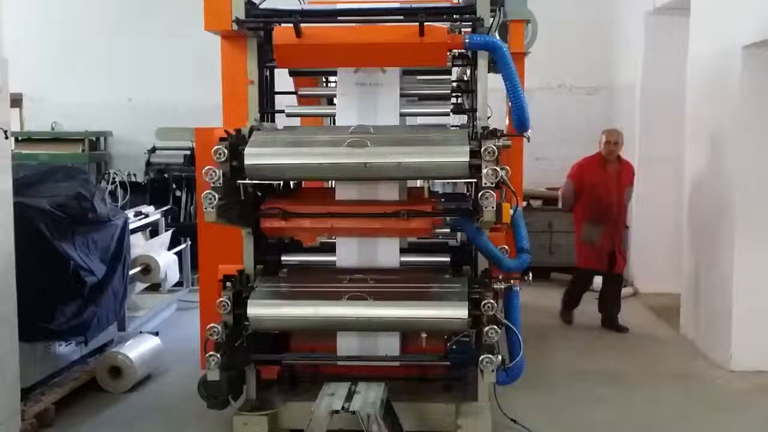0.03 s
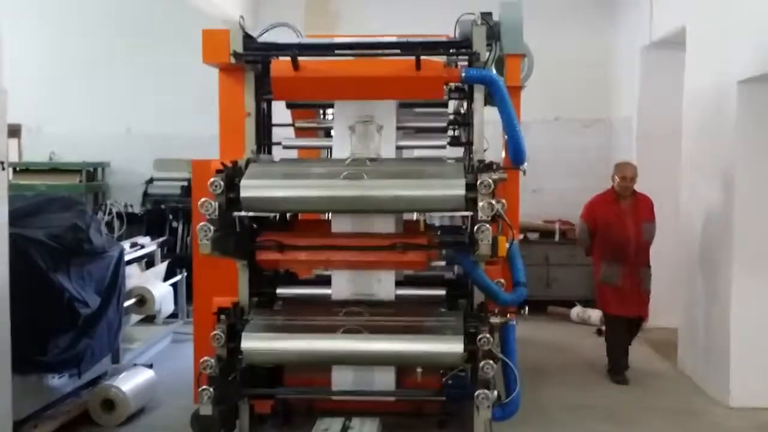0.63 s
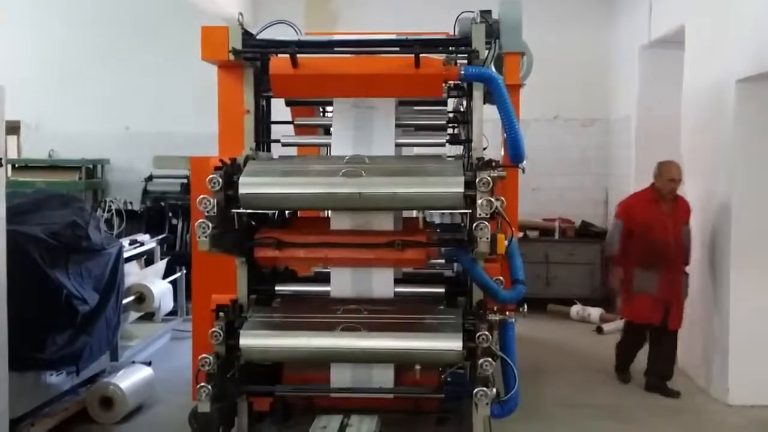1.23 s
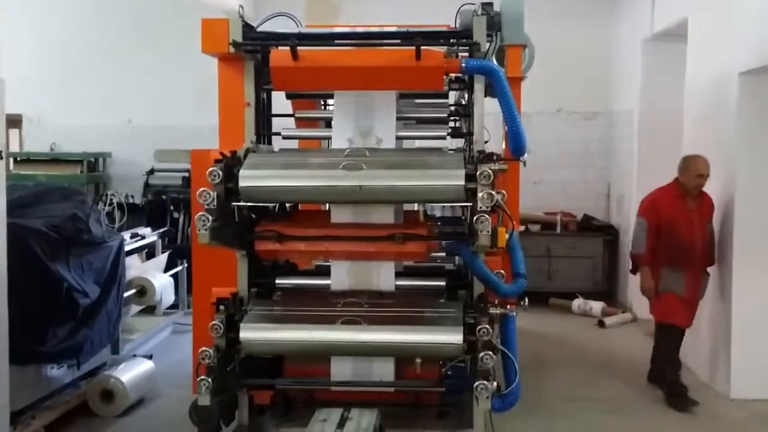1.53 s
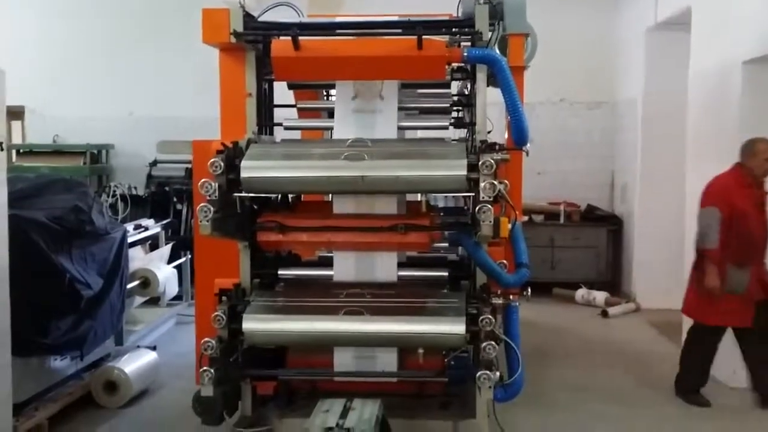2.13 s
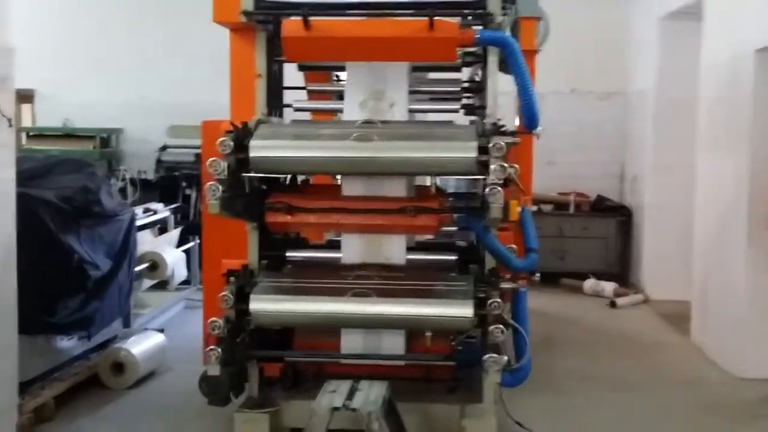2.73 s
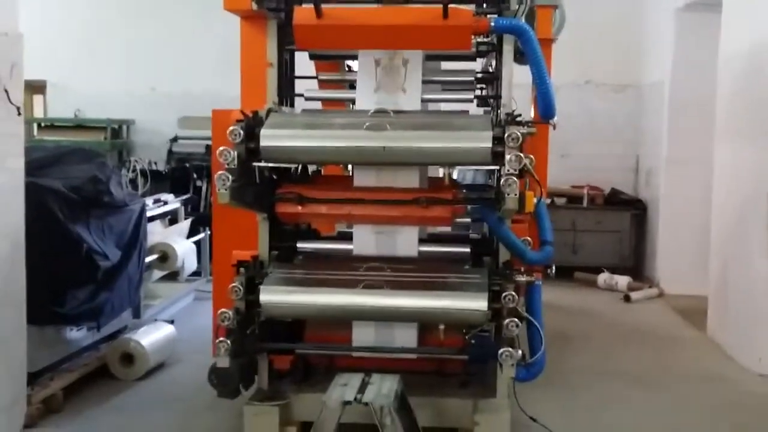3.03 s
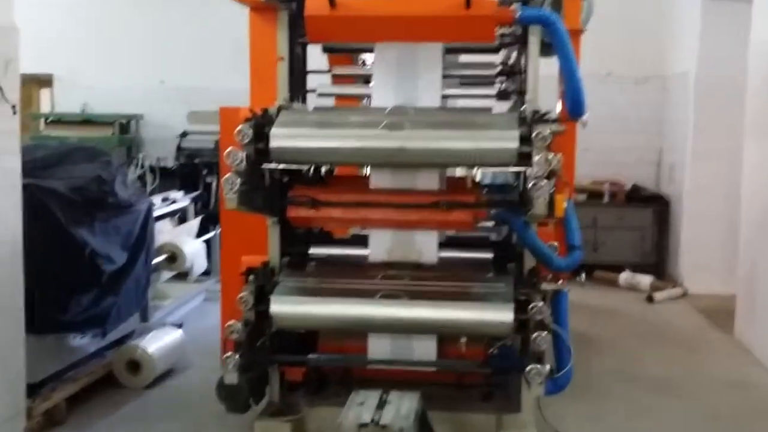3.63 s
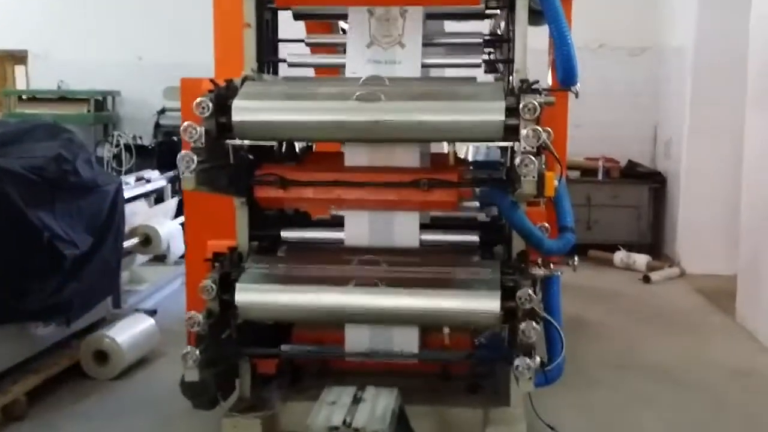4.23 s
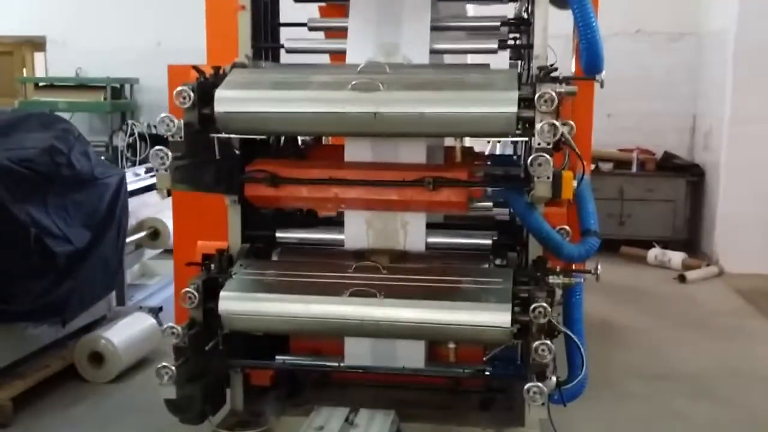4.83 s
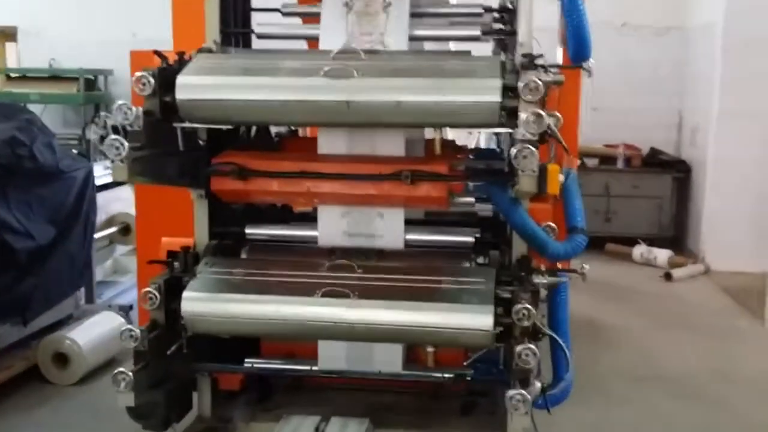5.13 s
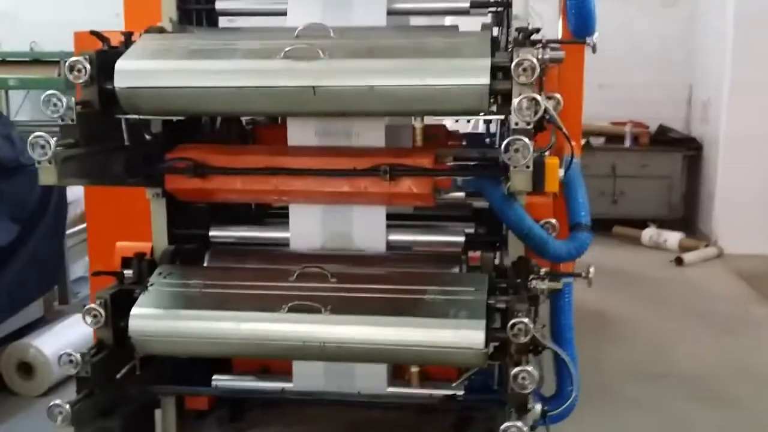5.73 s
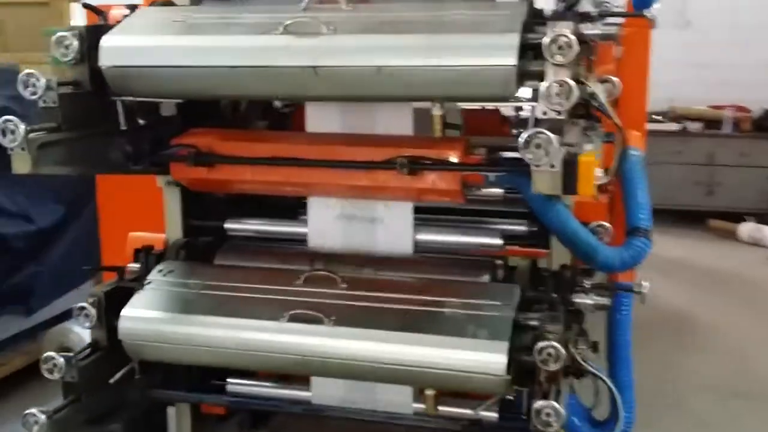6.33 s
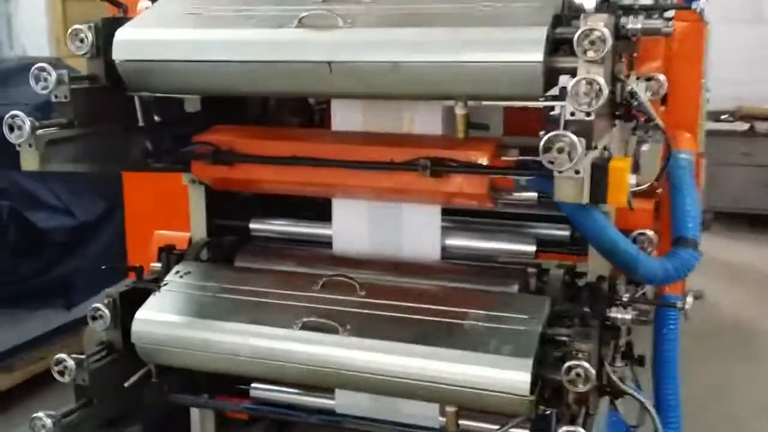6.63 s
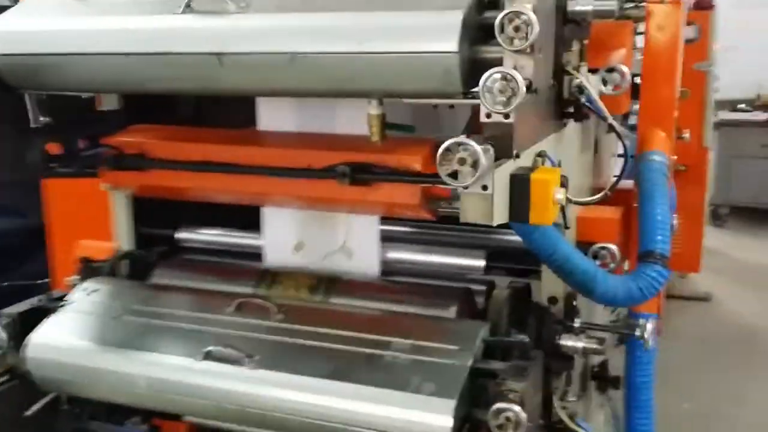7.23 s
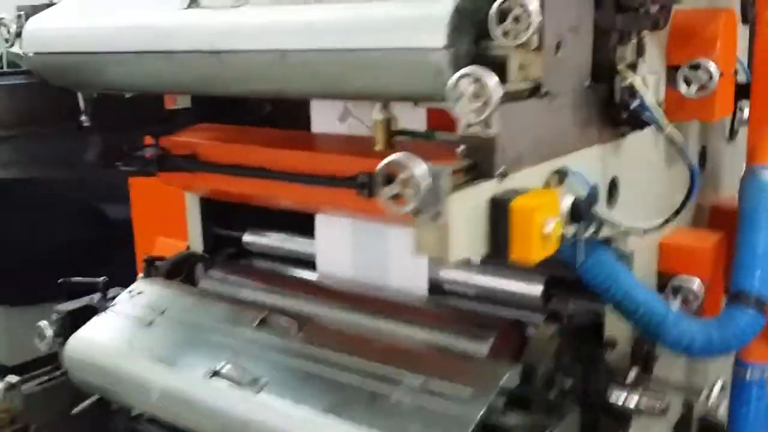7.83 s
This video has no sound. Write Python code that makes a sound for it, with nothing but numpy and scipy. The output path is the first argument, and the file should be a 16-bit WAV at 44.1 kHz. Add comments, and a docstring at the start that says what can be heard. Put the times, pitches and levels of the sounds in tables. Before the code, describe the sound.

A running printing machine fills a workshop with a low rumble, droning gears and the rush of drying fans. It fades in just after the start and keeps an even level. Plastic film hisses over the rollers, now and then swishing or snapping lightly, while steel rollers ring faintly and the machine's body throbs. A wavering fan whine and a very high motor whistle flicker as the microphone moves closer.

```python
"""After a moment of silence, a flexographic printing press fades in with a soft bump in a bare workshop.
From the start, rollers and gears rumble, dryer fans roar and whine, the film web hisses, the mains hum
and the motor's inverter sings near 8 kHz. Soon the film rips and snaps off the plates and a steel roller
rings out. Then the listener, a spaced pair of microphones, walks slowly up to the press: the high tones
flicker faster, the frame throbs now and then, and the film swishes over the rollers."""
import sys
import numpy as np
from scipy import signal
from scipy.fft import rfft, irfft
from scipy.io import wavfile

SR = 44100
rng = np.random.default_rng(int(sys.argv[2]) if len(sys.argv) > 2 else 0)


def generate_wav(signal):
    """Clip the signal to [-1, 1] and save it as 16-bit WAV at the path in sys.argv[1]."""
    frames = np.transpose(np.atleast_2d(signal))
    scaled = np.clip(frames, -1, 1) * 32767
    pcm = np.round(scaled).astype(np.int16)
    wavfile.write(sys.argv[1], SR, pcm)


N = 352800
TIME = np.arange(N) / SR
FREQS = np.maximum(np.arange(N // 2 + 1) * SR / N, 1)


def from_db(db):
    """Amplitude ratio of a level in decibels."""
    return 10 ** (np.asarray(db) / 20)


def rms_one(x):
    """Normalisation to unit mean power."""
    return x / np.sqrt(np.mean(np.abs(x) ** 2) + 1e-20)


def in_time(rows):
    """Linear interpolation of each level column at every sample."""
    times, *columns = np.transpose(rows)
    return [np.interp(TIME, times, column) for column in columns]


def at_hz(points, hz):
    """Interpolation of a spectrum on a logarithmic frequency axis."""
    knots_hz, values = np.transpose(points)
    return np.interp(np.log(hz), np.log(np.sort(knots_hz)), values)


def drift(rate):
    """Low-pass random process of rms 1, changing about `rate` times a second."""
    hop, settle = 100, 1000
    pole = np.exp(-2 * np.pi * rate * hop / SR)
    white = rng.standard_normal(N // hop + settle + 2)
    slow = signal.lfilter([1], [1, -2 * pole, pole * pole], white)[settle:]
    return np.interp(np.arange(N) / hop, np.arange(len(slow)), rms_one(slow))


def turbulence(flutter_db, rate):
    """Random amplitude modulation of two independent white noises."""
    return rng.standard_normal((2, N)) * from_db(flutter_db * drift(rate))


def swells(rows):
    """Gaussian envelopes, each rising and falling about its moment."""
    return sum(from_db(db) * np.exp(-(2 * (TIME - s) / length_s) ** 2) for s, length_s, db in rows)


def transient(peak_s, attack_s, decay_s):
    """Envelope of a linear rise and an exponential decay."""
    since = TIME - peak_s
    return np.clip(since / attack_s + 1, 0, 1) * np.exp(-np.maximum(since, 0) / decay_s)


def on_approach(far, change, start_s=1.285, end_s=5.7):
    """Linear change of a quantity as the listener walks up to the press."""
    return far + change * np.clip((TIME - start_s) / (end_s - start_s), 0, 1)


def dip(depth_db, start_s=5.1, fall_s=0.25, recover_s=0.76):
    """Brief attenuation in dB: a quick fall and a slow recovery."""
    since = TIME - start_s
    return -depth_db * np.clip(np.minimum(since / fall_s, 1 - (since - fall_s) / recover_s), 0, 1)


# likeness of the two microphone signals: (frequency [Hz], correlation [1])
CORRELATION = [(25, .5), (80, 1), (300, 0.92), (420, 0.89), (560, 0.63), (800, 0.63), (1050, 0.23),
               (1500, -0.29), (2300, 0.23), (3000, -0.016)]

def side_share(hz):
    """Spatial coherence as a side-to-mid ratio: long waves agree, those near 1.5 kHz partly oppose."""
    correlation = np.clip(at_hz(CORRELATION, hz), -.9, .993)
    return np.sqrt((1 - correlation) / (1 + correlation))


def stereo(mid, side):
    """Sum and difference of mid and side give left and right."""
    return np.array([mid + side, mid - side])


def room_noise(spectrum, excitation, ripple_db):
    """Diffuse field: interfering reflections ripple the spectrum of a noise; the mid has rms 1."""
    knots_hz = np.arange(150, SR / 2, 6)
    heights = rng.uniform(-0.95, 1, len(knots_hz)) * np.sqrt(3)
    ripple = np.interp(FREQS, knots_hz, heights, left=0)
    shaped = rfft(excitation) * from_db(at_hz(spectrum, FREQS) + ripple_db * ripple)
    mid, side = irfft(shaped[0], N), irfft(shaped[1] * side_share(FREQS), N)
    return stereo(mid, side) / np.std(mid)


def phasor(hz, wobble_hz, rate):
    """Random frequency modulation of a complex tone."""
    cycles = np.cumsum(hz + wobble_hz * drift(rate)) / SR + rng.random()
    return np.exp(2j * np.pi * cycles)


def reflections(fade_rate):
    """Rayleigh fading: summed reflections wander in amplitude and phase."""
    return drift(fade_rate) + 1j * drift(fade_rate)


def room_tone(hz, scatter, fade_rate, wobble_hz):
    """Multipath interference: a direct tone plus reflections that differ at each microphone."""
    carrier = phasor(hz, wobble_hz, rate=2.06)
    mid = rms_one(1 + scatter * reflections(fade_rate))
    side = side_share(hz) * rms_one(reflections(fade_rate))
    return np.sqrt(2) * stereo((mid * carrier).real, (side * carrier).real)


def walked_tone(hz, scatter, fade_rate, wobble_hz, still_pace=.2):
    """Motion through an interference pattern: a high tone flickers faster as the pace rises."""
    path = np.cumsum(on_approach(still_pace, 1 - still_pace)) / SR
    mid = np.interp(path, TIME, rms_one(1 + scatter * reflections(fade_rate)))
    side = np.interp(path, TIME, rms_one(1 + scatter * reflections(fade_rate)))
    side_phase = np.pi / 2 + np.interp(path, TIME, drift(0.73))
    side = side_share(hz) * side * np.exp(1j * side_phase)
    carrier = phasor(hz, wobble_hz, rate=2.01)
    return np.sqrt(2) * stereo((mid * carrier).real, (side * carrier).real)


# rumble of the gear train, resonance of the covers, churn of the rollers: (time [s], relative level [dB])
RUMBLE_LEVEL = [(0.9, -15), (2.02, -15), (2.23, -15.5), (2.79, -14.0), (3.0, -14.5), (3.77, -14.5),
                (4.33, -15), (4.54, -12.5), (5.59, -16), (6.15, -13.5), (6.78, -12.5), (7.13, -13),
                (7.55, -13), (7.97, -16.5)]
COVER_LEVEL = [(0.9, -25), (1.46, -22.5), (1.67, -26), (4.75, -23.5), (5.1, -20.5), (5.73, -22),
               (6.5, -22.5), (6.97, -19), (7.69, -19), (7.97, -18.5)]
CHURN_LEVEL = [(0.9, -38), (1.3, -26.5), (1.7, -30), (2.2, -38), (2.6, -26), (3.3, -23.5), (3.6, -22.5),
               (4.3, -26.5), (4.7, -27.5), (5.3, -26.5), (5.9, -26), (6.6, -24), (7.4, -23.5), (8.0, -27.5)]
# their spectra: (frequency [Hz], relative density [dB])
RUMBLE_SPECTRUM = [(55, -45), (85, -18.5), (110, -9), (160, -4.5), (205, -2), (250, -1.5), (315, -1),
                   (400, -7), (450, -7.5), (520, -20), (800, -60)]
COVER_SPECTRUM = [(300, -42), (420, -3), (465, 1.5), (520, -1), (570, -3), (640, -14.5), (850, -46)]
CHURN_SPECTRUM = [(290, -30.5), (345, -1.5), (380, 2.5), (405, -0.5), (450, -12), (540, -47.5)]
# lesser gear meshes and ringing panels: (frequency [Hz], mean level [dB])
MESH_TONES = [(139.3, -43), (172.3, -37.5), (229.5, -36), (242.9, -34.5), (295.4, -36), (399, -37.5),
              (553.1, -40.5), (1063.2, -43), (2644.5, -59), (2788, -47), (4160, -60)]

def rollers():
    """Forced vibration: the rollers shake frame and covers, and gear tones waver with the load."""
    rumble_db, = in_time(RUMBLE_LEVEL)
    cover_db, = in_time(COVER_LEVEL)
    churn_db, = in_time(CHURN_LEVEL)
    rumble = room_noise(RUMBLE_SPECTRUM, turbulence(flutter_db=-1, rate=47), ripple_db=-1.2)
    covers = room_noise(COVER_SPECTRUM, turbulence(flutter_db=0.2, rate=4.7), ripple_db=3.5)
    churn = room_noise(CHURN_SPECTRUM, turbulence(flutter_db=0.3, rate=11), ripple_db=2)
    gears = sum(from_db(db) * room_tone(hz, scatter=0.69, fade_rate=1.5, wobble_hz=1.206)
                for hz, db in MESH_TONES)
    return (from_db(rumble_db - 4.5) * rumble + from_db(cover_db - 4) * covers
            + from_db(churn_db) * churn + from_db(rumble_db - rumble_db.mean()) * gears)


# boom of the hall: (frequency [Hz], relative density [dB])
BOOM_SPECTRUM = [(20, -22), (45, -11), (62, -2), (75, 8), (90, 6), (110, -22), (160, -46)]

def hall_boom():
    """Room resonance: a low boom that weakens over the walk and dips once."""
    boom = room_noise(BOOM_SPECTRUM, turbulence(flutter_db=0.5, rate=8.7), ripple_db=-2)
    return from_db(on_approach(-41.5, -5.5) + dip(depth_db=4.5)) * boom


# drive gear's mesh tone, its fourth harmonic, a roller gear's mesh tone: (time [s], relative level [dB])
DRIVE_LEVEL = [(0.9, -35), (1.18, -34), (1.39, -26.5), (1.7, -45), (1.88, -21), (2.09, -31), (3.95, -27),
               (4.3, -26), (4.51, -23), (4.7, -27), (5.1, -37), (5.25, -23.5), (5.45, -21.5), (5.63, -21.5),
               (5.82, -35), (6.01, -27.5), (6.33, -25.5), (6.55, -38), (6.85, -36), (7.08, -22.5),
               (7.34, -28), (7.6, -22.5), (7.83, -23), (7.97, -15)]
FOURTH_LEVEL = [(0.9, -29), (1.5, -31.5), (1.68, -34), (2.2, -36), (2.55, -27), (2.75, -36), (2.95, -34),
                (3.25, -25), (3.55, -28.5), (3.72, -42), (3.92, -28), (4.3, -36), (4.8, -40), (5.08, -29),
                (5.38, -41), (5.65, -37), (6.1, -31.5), (6.45, -48), (6.9, -29.5), (7.25, -28.5),
                (7.5, -40), (7.75, -30.5), (8.0, -34)]
ROLLER_GEAR_LEVEL = [(0.9, -27.5), (3.5, -29), (3.68, -28), (4.1, -19), (4.45, -36), (4.75, -26),
                     (5.17, -19), (5.35, -38), (5.72, -34), (5.9, -27), (6.22, -19), (6.43, -21.5),
                     (6.6, -40), (8.0, -40)]

def gear_mesh(drive_hz=184.6, roller_hz=339.8):
    """Periodic tooth contact: two gears drone at their mesh rates, the drive also two octaves above."""
    drive_db, = in_time(DRIVE_LEVEL)
    fourth_db, = in_time(FOURTH_LEVEL)
    roller_db, = in_time(ROLLER_GEAR_LEVEL)
    drive = room_tone(drive_hz, scatter=0.15, fade_rate=4.4, wobble_hz=0.86)
    fourth = room_tone(4 * drive_hz, scatter=0.21, fade_rate=4.2, wobble_hz=1.146)
    roller = room_tone(roller_hz, scatter=0.57, fade_rate=7, wobble_hz=2.522)
    return (from_db(drive_db - 0.2) * drive + from_db(fourth_db) * fourth
            + from_db(roller_db - 1.5) * roller)


# ringing of the hollow sheet-metal guards: (time [s], level [dB])
GUARD_LEVEL = [(0.9, -33.5), (1.25, -30.5), (1.45, -42), (1.95, -32), (2.15, -35), (2.4, -31), (2.6, -37),
               (2.95, -35), (3.1, -40), (3.4, -38), (4.4, -38.5), (4.55, -35.5), (5.0, -36), (5.4, -52),
               (5.8, -48), (6.05, -40), (7.15, -38.5), (7.35, -53), (8.0, -52)]
# modes of the guards and of the bare steel rollers: (frequency [Hz], relative level [dB])
GUARD_RESONANCES = [(766, -4), (815, -3), (858, -1), (911, -2.5), (958, 0.5), (978, 0)]
ROLLER_RESONANCES = [(1760, -3), (1841, 1.5), (1874, -4), (1960, 0), (2035, 3), (2078, -9.5)]

def ringing_metal(roller_db=-43.5):
    """Modal resonance: the gears keep the guards ringing, and the rollers' close modes beat faintly."""
    guard_db, = in_time(GUARD_LEVEL)
    guards = sum(from_db(db) * room_tone(hz, scatter=4.1, fade_rate=11, wobble_hz=2.134)
                 for hz, db in GUARD_RESONANCES)
    steel = sum(from_db(db) * room_tone(hz, scatter=3, fade_rate=20, wobble_hz=3.503)
                for hz, db in ROLLER_RESONANCES)
    return from_db(guard_db) * guards + from_db(roller_db) * steel


# rush of the dryer nozzles: (time [s], relative level [dB])
NOZZLE_LEVEL = [(0.9, -20.5), (1.25, -20.5), (2.45, -20), (3.1, -21), (3.72, -21), (3.98, -21.5),
                (4.35, -20), (5.05, -20.5), (5.24, -22), (5.7, -22.5), (6.25, -20.5), (7.0, -21.5),
                (7.7, -21.5), (7.97, -22.5)]
# air in the ducts and from the nozzles: (frequency [Hz], relative density [dB])
DUCT_SPECTRUM = [(350, -30), (520, -2.5), (610, 0.5), (700, 1), (830, -0.9), (980, -2), (1080, -3),
                 (1280, -4), (1450, -49), (2200, -61)]
NOZZLE_SPECTRUM = [(800, -30), (1150, -18.5), (1330, 2), (1620, 0), (1850, 1.3), (2100, 1.0), (2300, -1.5),
                   (2550, -4), (2900, -21), (4000, -53)]

def dryer_air():
    """Turbulent flow: air roars in the ducts and rushes from the nozzles."""
    duct_db = on_approach(-22.5, -1) + dip(depth_db=1.5)
    nozzle_db, = in_time(NOZZLE_LEVEL)
    duct = room_noise(DUCT_SPECTRUM, turbulence(flutter_db=0.96, rate=17), ripple_db=2)
    nozzle = room_noise(NOZZLE_SPECTRUM, turbulence(flutter_db=0.77, rate=62), ripple_db=2.5)
    return from_db(duct_db) * duct + from_db(nozzle_db - 4) * nozzle


# harmonics of the dryer fan's shaft rate: (order [1], level [dB])
SHAFT_HARMONICS = [(6, -33.5), (7, -36), (8, -33), (12, -42.5), (13, -44.5), (16, -50), (18, -50),
                   (19, -40.5), (20, -41.5), (21, -43.5), (24, -43)]
# whine of that fan along its standing waves, and of a slightly slower fan: (time [s], level [dB])
WHINE_LEVEL = [(0.9, -40), (1.15, -29.5), (1.5, -31.5), (1.85, -31), (2.08, -42), (2.55, -44), (2.8, -36),
               (3.1, -35), (3.4, -42), (3.75, -32), (3.87, -43), (4.1, -36), (4.36, -27.5), (4.6, -32.5),
               (5.0, -30), (5.25, -47), (5.6, -41), (5.78, -32), (5.98, -39), (6.25, -33.5), (6.55, -26),
               (6.8, -34), (6.95, -35), (7.2, -45), (7.5, -33.5), (7.65, -35), (7.8, -32), (8.0, -43)]
SECOND_WHINE_LEVEL = [(0.9, -44), (1.85, -57), (2.7, -48), (3.2, -37), (3.7, -41), (4.9, -50), (5.05, -41),
                      (6.7, -42), (7.1, -30), (7.35, -34), (7.6, -42), (8.0, -46)]

def fans(shaft_hz=47.915, blade_count=40, second_blade_hz=1907):
    """Blade-passing tones: two fans beat against each other above a drone of shaft harmonics."""
    whine_db, = in_time(WHINE_LEVEL)
    second_db, = in_time(SECOND_WHINE_LEVEL)
    drone = sum(from_db(db) * room_tone(order * shaft_hz, scatter=1, fade_rate=2.17, wobble_hz=1.26)
                for order, db in SHAFT_HARMONICS)
    whine = walked_tone(blade_count * shaft_hz, scatter=0.45, fade_rate=30, wobble_hz=0.99)
    second = walked_tone(second_blade_hz, scatter=0.77, fade_rate=4.3, wobble_hz=1.174)
    return drone + from_db(whine_db) * whine + from_db(second_db) * second


def crackle(per_s, spread_db, decay_s):
    """Poisson process: tiny decaying snaps at random moments, most weak and a few stronger."""
    sizes = from_db(spread_db * np.minimum(rng.exponential(1, N), 4))
    snaps = (rng.random(N) < per_s / SR) * sizes
    power = signal.lfilter([1], [1, -np.exp(-2 / (decay_s * SR))], snaps ** 2 + 1e-18)
    return rms_one(np.sqrt(power) * rng.standard_normal((2, N)))


# hiss of the film web: (time [s], relative level [dB])
HISS_LEVEL = [(0.62, -21), (0.7, -23.5), (0.79, -24), (0.84, -20.5), (0.9, -21.5), (1.2, -21.5),
              (1.46, -21.5), (2.05, -22), (2.65, -22), (3.1, -24), (3.3, -22.5), (3.84, -23), (4.3, -22.5),
              (4.61, -22.5), (4.85, -22.5), (5.3, -24), (5.82, -24.5), (6.01, -22.5), (6.4, -23.5),
              (6.6, -22), (6.85, -23), (7.2, -22), (7.78, -24), (7.97, -24.5)]
# the film sliding and peeling: (frequency [Hz], relative density [dB])
SLIDE_SPECTRUM = [(1700, -19), (2400, -9), (2700, -0.5), (3200, -2.5), (3900, -2), (4600, -6), (5600, -7.5),
                  (6900, -9.5), (7800, -10), (10000, -47)]
PEEL_SPECTRUM = [(5000, -33), (6800, -14.5), (7500, -6.5), (8150, 0), (8700, -1.5), (9500, -4.5),
                 (11000, -7.5), (12000, -11), (13000, -22), (14500, -34)]
# brighter sizzles where the film sticks and rips off the plate: (time [s], boost [dB])
RIP_BOOSTS = [(1.12, 1.5), (1.75, 0), (1.99, 4), (2.52, 1.5), (3.289, 2.5), (4.13, 2), (4.86, 1),
              (7.17, 1.5), (7.8, 1.5), (7.93, 3)]

def film_web():
    """Friction and adhesion: the film slides over rollers and peels off tacky ink in tiny snaps."""
    hiss_db, = in_time(HISS_LEVEL)
    rip_db = sum(db * transient(s, attack_s=.02, decay_s=0.094) for s, db in RIP_BOOSTS)
    snaps = crackle(per_s=320, spread_db=1.5, decay_s=0.014)
    slide = room_noise(SLIDE_SPECTRUM, turbulence(flutter_db=0.8, rate=14) + 0.38 * snaps, ripple_db=2)
    peel = room_noise(PEEL_SPECTRUM, turbulence(flutter_db=1, rate=11) + 0.52 * snaps, ripple_db=0.5)
    return from_db(hiss_db - 6) * slide + from_db(hiss_db - 9.5 + rip_db) * peel


# hum of the motor's iron: (time [s], relative level [dB])
HUM_LEVEL = [(0.9, -24), (1.5, -25.5), (1.92, -25.5), (2.1, -25.5), (2.53, -23.5), (3.25, -25.5),
             (3.91, -26), (4.54, -24), (4.8, -27), (5.05, -30), (5.95, -30), (6.1, -29), (6.3, -29),
             (6.6, -24), (6.85, -30.5), (7.3, -28.5), (7.76, -23.5), (7.97, -27)]

def mains_hum(hum_hz=100.2):
    """Magnetostriction: iron vibrates at twice the mains frequency."""
    hum_db, = in_time(HUM_LEVEL)
    return from_db(hum_db - 4) * room_tone(hum_hz, scatter=0.15, fade_rate=5, wobble_hz=0.21)


# the inverter's three switching tones: (frequency [Hz])
SWITCHING_HZ = [7986, 8043, 8101]
# the same at the listener's position: (time [s], lower level [dB], middle level [dB], upper level [dB])
SWITCHING_LEVELS = [(0.9, -43, -42, -42), (1.2, -40, -40.5, -41), (1.45, -44, -43, -45),
                    (1.7, -41, -36, -44), (2.25, -53, -48, -48), (2.55, -44, -46, -50),
                    (2.85, -50, -42, -46), (3.1, -42, -46, -42), (3.3, -40, -44, -39.5),
                    (3.5, -50, -42, -42), (3.9, -52, -44, -41), (4.2, -41, -42, -40.5),
                    (4.5, -44, -45, -43), (4.8, -43, -42, -37), (5.08, -42.5, -39, -40),
                    (5.3, -46, -44, -43), (5.75, -46, -43, -45), (6.05, -41, -36, -39.5),
                    (6.4, -41, -52, -43), (6.65, -50, -43, -40.5), (6.95, -40, -42, -38),
                    (7.25, -41, -39, -38), (7.75, -50, -43, -43), (8.0, -42, -36, -40)]
# fainter sidebands of the switching: (frequency [Hz], level [dB])
SWITCHING_SIDEBANDS = [(7604, -50), (8481, -50.5)]

def inverter():
    """Beating: closely spaced switching tones interfere, flanked by two sidebands."""
    whistles = sum(from_db(db) * walked_tone(hz, scatter=0.57, fade_rate=13, wobble_hz=2.48)
                   for hz, db in zip(SWITCHING_HZ, in_time(SWITCHING_LEVELS)))
    sidebands = sum(from_db(db) * walked_tone(hz, scatter=0.96, fade_rate=5.3, wobble_hz=1.84)
                    for hz, db in SWITCHING_SIDEBANDS)
    return whistles + sidebands


# a soft low bump during the fade-in: (time [s], duration [s], relative peak level [dB])
BUMP_SWELL = [(0.745, .04, -26.5)]
# its spectrum: (frequency [Hz], relative density [dB])
BUMP_SPECTRUM = [(20, -6), (45, -2), (70, 0), (110, -15), (200, -43)]

def bump():
    """Band-limited pulse: a short swell of low noise is heard as a bump."""
    return swells(BUMP_SWELL) * room_noise(BUMP_SPECTRUM, turbulence(flutter_db=0.5, rate=8), ripple_db=0)


# the film's sharpest snaps: (time [s], decay time [s], peak level [dB])
SNAP_EVENTS = [(1.134, .02, -34), (1.952, .009, -28), (2.028, .007, -30.5), (4.116, .035, -34),
               (4.143, .02, -33), (7.198, .006, -34)]
# their spectrum: (frequency [Hz], relative density [dB])
SNAP_SPECTRUM = [(5000, -20), (8000, -4), (9500, -1), (11500, -2.5), (13000, -11), (14500, -25)]

def film_snaps():
    """Impulsive release: the film leaves the plate in bright bursts that decay exponentially."""
    envelope = sum(from_db(db) * transient(s, attack_s=.002, decay_s=decay_s)
                   for s, decay_s, db in SNAP_EVENTS)
    return envelope * room_noise(SNAP_SPECTRUM, rng.standard_normal((2, N)), ripple_db=0)


# a bare steel roller sings out: (time [s], duration [s], frequency [Hz], peak level [dB])
ROLLER_NOTES = [(1.22, .16, 2078, -41), (1.48, .18, 2100, -35), (2.05, .3, 2078, -36), (2.0, .4, 2050, -40),
                (2.75, .25, 1850, -40), (3.02, .22, 1841, -35.5), (3.3, .2, 1760, -40.5),
                (3.56, .2, 2100, -41), (4.5, .18, 1830, -41), (4.65, .3, 2164, -43), (5.0, .14, 1841, -33),
                (6.25, .3, 1850, -37)]

def singing_roller():
    """Lightly damped resonance: single modes of a roller swell and fade."""
    return sum(swells([(s, length_s, db)]) * walked_tone(hz, scatter=0.28, fade_rate=15, wobble_hz=2.82)
               for s, length_s, hz, db in ROLLER_NOTES)


# throbs of the frame: (time [s], duration [s], frequency [Hz], peak level [dB])
FRAME_THROBS = [(1.347, 0.14, 230, -21.5), (2.05, 0.35, 290, -23.5), (2.717, 0.2, 232, -23),
                (2.818, 0.34, 288, -27), (3.852, 0.072, 292, -16), (4.457, 0.23, 290, -23.5),
                (4.763, 0.21, 140, -23.5), (5.036, 0.14, 512, -20.5), (5.062, 0.09, 289, -17.5),
                (5.24, 0.15, 512, -24), (5.388, 0.19, 295, -19), (5.73, 0.085, 290, -16.5),
                (5.804, 0.17, 140, -25), (6.254, 0.12, 288, -16), (6.57, 0.072, 298, -15.5),
                (6.66, 0.27, 392, -22.5), (7.52, 0.16, 289, -27), (7.68, 0.19, 518, -26)]

def throbbing_frame():
    """Structural resonance: low modes of the frame swell briefly, wavering in pitch."""
    return sum(swells([(s, length_s, db)]) * np.sqrt(2) * phasor(hz, wobble_hz=3.1, rate=5.83).imag
               for s, length_s, hz, db in FRAME_THROBS)


# swishes of the film: (time [s], duration [s], relative peak level [dB])
SWISH_SWELLS = [(2.06, .14, -33), (3.34, 0.26, -34), (3.98, .12, -37), (4.36, .26, -32), (4.85, 0.12, -34),
                (5.97, 0.12, -37), (7.34, .16, -34)]
# their spectrum: (frequency [Hz], relative density [dB])
SWISH_SPECTRUM = [(2000, -25), (3000, 4.5), (4000, -2), (5200, -3), (7000, 0), (9500, -32)]

def film_swishes():
    """Sliding friction: fluttering noise swells as the film sweeps over a roller."""
    friction = room_noise(SWISH_SPECTRUM, turbulence(flutter_db=3.5, rate=22), ripple_db=2)
    return from_db(1) * swells(SWISH_SWELLS) * friction


# balance of the microphones: (frequency [Hz], left minus right level [dB])
BALANCE = [(60, -2.5), (400, -1), (700, -2.5), (1200, -3), (1800, -4), (2400, -1), (3100, 1.3), (3800, 0.5),
           (4500, -4.5), (7500, -1.5), (8400, -3.5), (9800, -3), (11800, -3), (12800, 9), (14000, 4)]

def scene():
    """Superposition of all parts, a little louder on the right where a bare wall reflects them."""
    press = rollers() + hall_boom() + gear_mesh() + ringing_metal()
    press += dryer_air() + fans() + film_web() + mains_hum() + inverter()
    press += bump() + film_snaps() + singing_roller() + throbbing_frame() + film_swishes()
    lean_db = at_hz(BALANCE, FREQS) / 2
    return irfft(rfft(press) * from_db([lean_db, -lean_db]), N)


def record(dry):
    """A linear fade from silence, soft saturation of the highest peaks and a low-pass filter."""
    fade_start_s, fade_end_s, peak_limit, cutoff_hz = 0.59, 0.89, .95, 14500
    faded = dry * np.clip((TIME - fade_start_s) / (fade_end_s - fade_start_s), 0, 1)
    rounded = faded / (1 + (faded / peak_limit) ** 8) ** (1 / 8)
    return signal.sosfilt(signal.ellip(12, .1, 90, cutoff_hz, fs=SR, output="sos"), rounded)


dry = scene()
out = record(dry)
generate_wav(out)
```